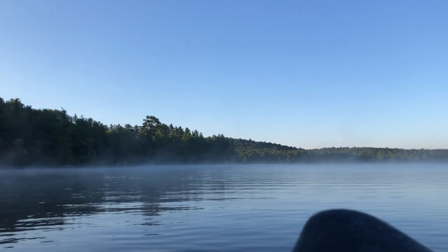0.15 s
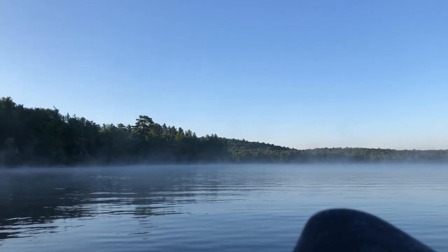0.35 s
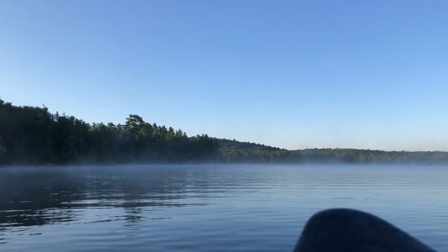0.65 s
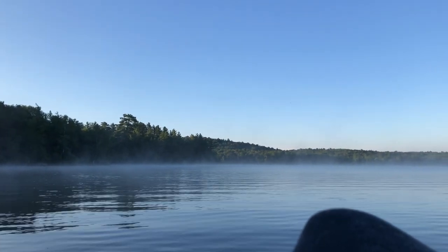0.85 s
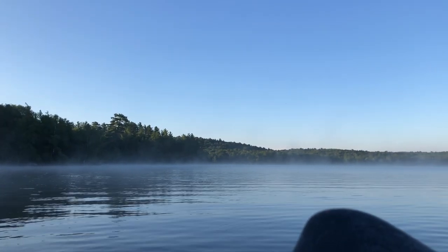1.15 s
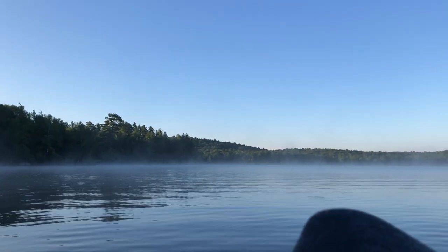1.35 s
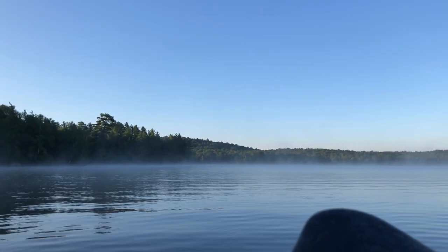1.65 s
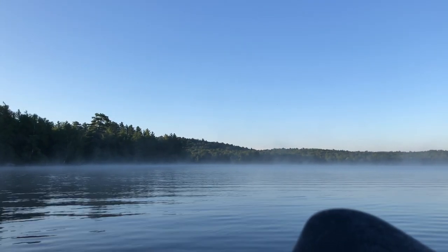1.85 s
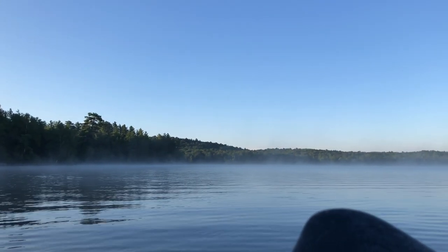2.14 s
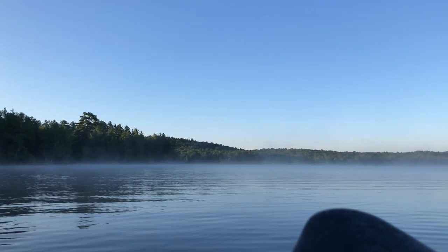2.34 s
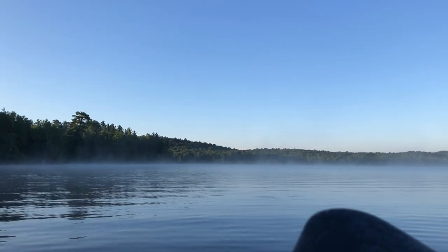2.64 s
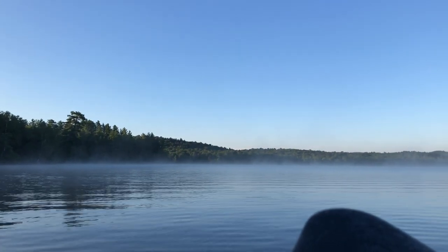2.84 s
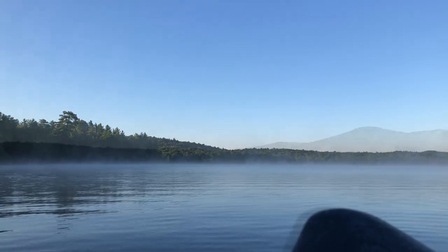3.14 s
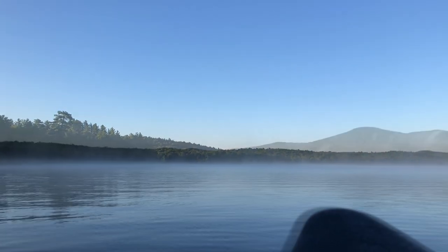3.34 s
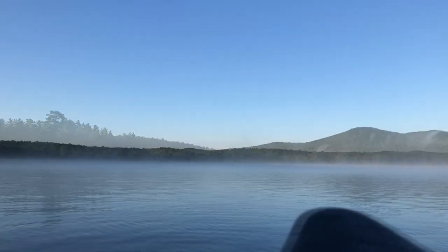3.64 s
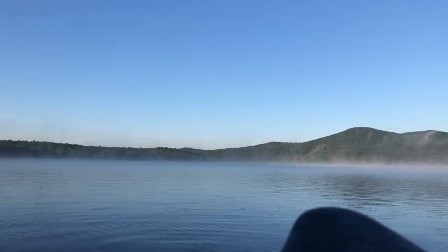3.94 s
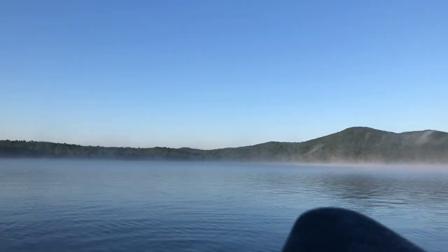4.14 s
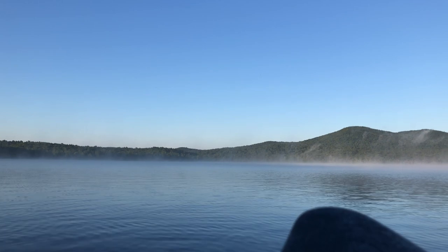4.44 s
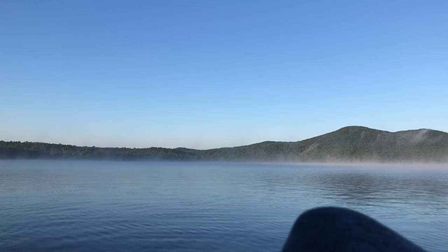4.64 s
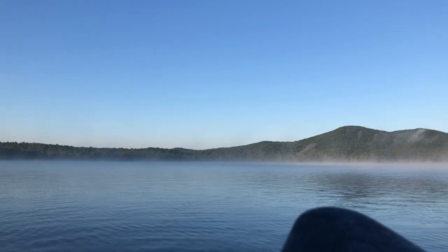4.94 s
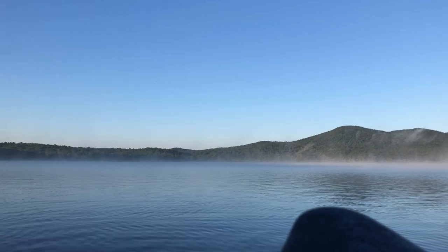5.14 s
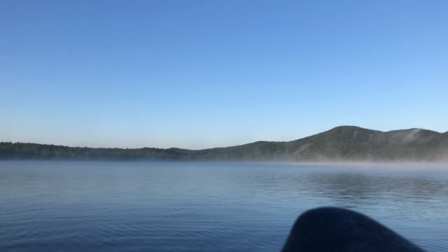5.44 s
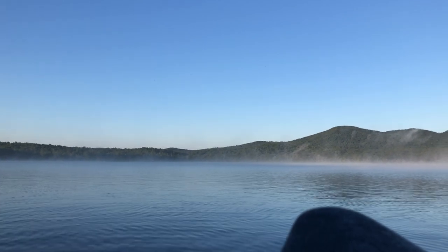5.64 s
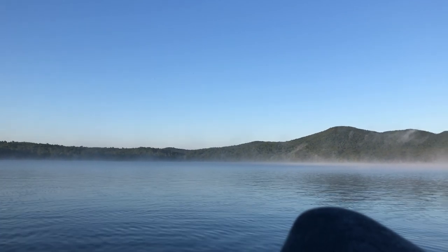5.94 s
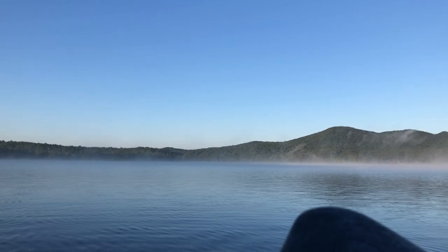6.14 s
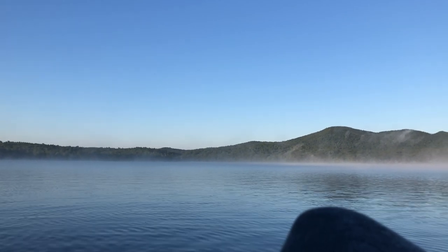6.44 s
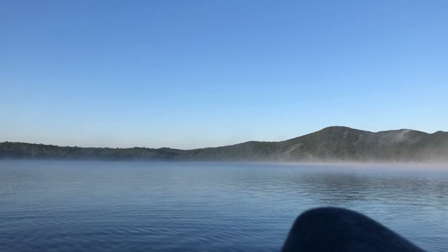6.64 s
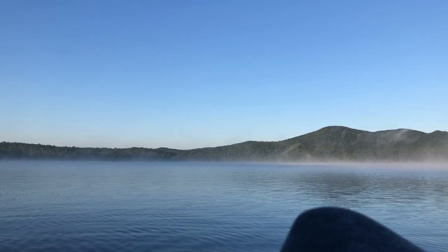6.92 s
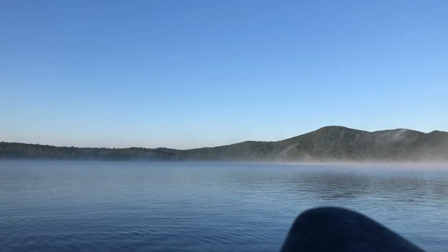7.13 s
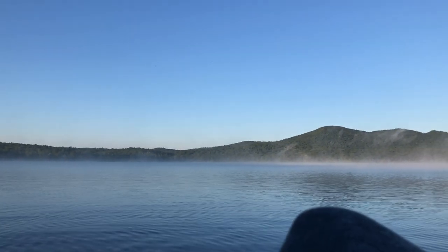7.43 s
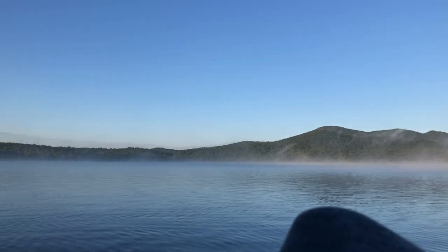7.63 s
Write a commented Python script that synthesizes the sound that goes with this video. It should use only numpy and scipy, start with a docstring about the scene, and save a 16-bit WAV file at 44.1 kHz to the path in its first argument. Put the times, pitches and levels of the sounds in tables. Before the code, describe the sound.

Heard from a small boat on a still lake, gentle lapping, gurgles and dull paddle bumps lie beneath three far-off loon tremolos and faint songbird notes. Then three close loon calls ring out overhead, each opening with a brief yelp and trailing a long echo. A faint low drone creeps in under the later calls, along with light microphone hiss.

```python
"""A calm lake, from a small boat. Loons fly over: their tremolos are nearly pure tones throbbing in pitch
and level, edged with short yelps, scattered by ripples and echoed by the wooded shores. Three distant
calls cross-fade into three close ones overhead. Water laps and gurgles, the hull rumbles and thumps,
and a songbird whistles on the shore. Late on, a faint low drone climbs in. The microphone hisses."""
import sys
import numpy as np
from scipy import signal
from scipy.fft import rfft, irfft, next_fast_len
from scipy.io import wavfile
from scipy.ndimage import map_coordinates

SR = 44100
rng = np.random.default_rng(int(sys.argv[2]) if len(sys.argv) > 2 else 0)


def transcribe(signal):
    """Save signal, clipped to [-1, 1], as a 16-bit WAV file at the path in sys.argv[1]."""
    frames = np.atleast_2d(signal).T
    limited = np.clip(frames, -1, 1)
    pcm = np.round(limited * 32767).astype(np.int16)
    wavfile.write(sys.argv[1], SR, pcm)


N = 343098

# loon tremolos: start t/s, end t/s, slump t/s, slump depth, t/s of one pitch dip, throb rate/Hz,
# crest f/Hz, swing/Hz, base level/dB, 2nd and 3rd harmonic level/dB re the fundamental,
# echo level/dB, Doppler ratio of the echo
LOON_CALLS = [(-.55, .25, .24, 0.61, .066, 12.3, 1252, 42.2, -50.7, -20.5, -26, -60.5, 1.006),
              (.628, 1.42, 1.4, 0.48, .683, 12.9, 1267, 57, -60, -19.5, -26, -61, 1.02),
              (1.828, 2.32, 2.17, .35, 2.102, 12, 1288, 46, -60.5, -15.5, -23, -61.5, 1.035),
              (4.569, 5.163, 5.152, 0.81, 4.73, 13.5, 1362, 76, -41.5, -40.5, -32, -58.3, 1),
              (5.558, 6.379, 6.346, 1, 5.579, 13.78, 1358, 70.7, -39, -33.5, -32, -56.5, 1.003),
              (6.702, 7.425, 7.342, 1.05, 6.752, 13.54, 1346, 62.3, -38, -29.5, -35, -58, 1.01)]
# throat resonance that colours the 4th harmonic: f/Hz, level/dB re the fundamental
THROAT_RESONANCE = [(4500, -44), (4850, -27), (5100, -37), (5300, -46.5), (5700, -52)]
# swells and fades in the loudness of the tremolos: t/s, gain/dB
TREMOLO_SWELLS = [(0, 2.5), (.11, -1.5), (.73, 1.5), (.97, -6.5), (1.17, 3), (1.96, -9), (2.06, 2.5),
                  (4.9, 0.5), (5.0, -2.5), (5.13, 1), (5.6, -.5), (6.1, 1), (6.72, -2), (6.94, 0.5),
                  (7.09, -1.5), (7.24, 1)]
# fader ride of the lapping: t/s, base level/dB
LAPPING_RIDE = [(0.0, -56), (1.08, -59), (1.86, -56), (3.03, -60.5), (3.4, -64), (7.78, -63.5)]
# colour of the lapping under the far calls: f/Hz, relative level/dB
FAR_LAPPING_EQ = [(20, -35), (60, -5.5), (110, -0.5), (170, 1), (250, -3.5), (320, -1), (470, -5),
                  (650, -3.5), (1000, -14), (1600, -23), (2100, -26.5), (3000, -28.5), (6000, -36),
                  (15000, -58)]
# colour of the lapping under the near calls: f/Hz, relative level/dB
NEAR_LAPPING_EQ = [(25, -34.5), (65, -0.5), (115, 0.9), (170, 1.6), (300, -1.5), (480, -6), (700, -9.5),
                   (1000, -13.5), (1500, -20.5), (2100, -22.5), (3000, -23), (6000, -34), (15000, -54.5)]
# fader ride of the hull's rumble: t/s, base level/dB
RUMBLE_RIDE = [(0.0, -72.5), (1.73, -67), (2.14, -73), (2.36, -65), (2.55, -63.5), (2.93, -69),
               (3.25, -66.5), (4.85, -76), (5.09, -71), (5.61, -77.5), (6.72, -78.5), (7.09, -70.5),
               (7.78, -80)]
# colour of the hull's rumble: f/Hz, relative level/dB
RUMBLE_EQ = [(18, -27), (35, -6), (50, 2.5), (80, 2), (120, -7.5), (200, -21), (500, -57)]
# colour of the microphone hiss: f/Hz, relative level/dB
HISS_EQ = [(100, -1), (2000, 2.5), (4800, 4), (7000, 1), (10000, -0.5), (13500, -1.5), (15000, 1.5),
           (16000, -4)]
# songbird notes before tuning and trim: start t/s, end t/s, first f/Hz, last f/Hz, level/dB
SONGBIRD_NOTES = [(.41, 0.447, 2640, 2780, -68), (0.85, 0.86, 3090, 2330, -60.5),
                  (1.495, 1.527, 4150, 4420, -75), (1.532, 1.569, 3250, 2500, -72),
                  (1.602, 1.66, 2830, 2500, -72), (1.67, 1.73, 2800, 2910, -78),
                  (1.75, 1.785, 3300, 2450, -72), (2.925, 2.956, 3200, 2910, -72),
                  (2.955, 2.978, 2900, 3160, -73), (3.067, 3.1, 3400, 2750, -70),
                  (3.111, 3.146, 2490, 3390, -68.5), (3.143, 3.188, 3250, 2240, -69),
                  (3.32, 3.348, 2750, 3250, -77), (3.359, 3.392, 3300, 2650, -76),
                  (4.335, 4.385, 4200, 4800, -76)]
# yelps that open or close a call: start t/s, end t/s, first f/Hz, last f/Hz, upward bow/Hz,
# base level/dB, fundamental level/dB re base
LOON_YELPS = [(0.59, 0.635, 690, 1030, -45, -55, -7), (1.789, 1.827, 779, 945, -11, -57, -7),
              (4.478, 4.518, 706, 807, -9, -53.5, -12), (4.508, 4.572, 833, 865, 71.5, -41.3, -17),
              (5.169, 5.19, 850, 690, -25.5, -57.5, -19), (5.525, 5.56, 767, 1017, -19.5, -40.5, -20),
              (6.679, 6.708, 730, 1030, -39, -42.3, -19)]
# overtones of a yelp: harmonic number, level/dB re base
YELP_OVERTONES = [(2, -1), (3, -36), (4, -32.5), (5, -32.5)]
# paddle and water bumping the hull: t/s, peak level/dB before trim and low cut, f/Hz
HULL_THUMPS = [(.912, -45.5, 70), (1.812, -43, 95), (1.83, -40.5, 67.7), (2.252, -40.5, 95),
               (2.418, -45, 55.5), (2.473, -42.5, 144.4), (2.487, -41.5, 61.9), (2.64, -51, 70),
               (2.91, -45.5, 75), (3.088, -48, 85.3), (3.157, -46, 65), (3.222, -45, 85),
               (3.275, -43, 89.6), (3.359, -45, 80), (3.745, -46, 56), (4.92, -49.5, 45)]

FADE_START_S, FADE_END_S = 3.13, 3.98  # cross-fade from the far calls to the near ones
CREST_LEAD_S, SAG_HZ_PER_S2 = .54, 290  # pitch crests this long before the slump, sagging either side
SLUMP_HZ, SLUMP_DB, SLUMP_S = 135, 4.5, .028  # the voice gives way: pitch drop, level drop, how quickly
LOUDEST_SHARE, ARCH_DB = 0.35, 19  # where a tremolo peaks; its fall one whole length from there
SLOWING_PER_S = .041  # share of the throb rate lost each second
BRIGHT_DB, BRIGHT_S = 8.5, 0.09  # overtone boost on the attack, and its decay


def amp(db):
    """Decibels to gain."""
    return 10 ** (np.asarray(db) / 20)


def unit(x):
    """Scale to rms 1."""
    return x / np.sqrt(np.mean(x ** 2) + 1e-20)


def eq_db(points, hz):
    """Level of an EQ curve at hz, on a log frequency axis."""
    freqs, levels = np.transpose(points)
    return np.interp(np.log(hz + 1), np.log(freqs), levels)


def ride_db(points, t):
    """Level of a fader ride at the times t."""
    return np.interp(t, *np.transpose(points))


def span(start, end, edge_s):
    """A note's sample times, its progress from 0 to 1, and a soft-edged gate."""
    t = np.arange(start, end, 1 / SR)
    gate = np.sin(np.pi / 2 * np.clip(np.minimum(t - t[0], t[-1] - t) / edge_s, 0, 1)) ** 2
    return t, (t - start) / (end - start), gate


def wobble(size, rate):
    """Smooth random modulation, rate knots a second."""
    return map_coordinates(rng.standard_normal(2 ** 13), [np.arange(size) * rate / SR], mode="wrap")


def phase_of(hz):
    """Running phase of a pitch curve."""
    return 2 * np.pi * np.cumsum(hz) / SR


def noise(eq):
    """Coloured noise of rms 1."""
    size = next_fast_len(N + 2 ** 13)
    colour = amp(eq_db(eq, np.fft.rfftfreq(size, 1 / SR)))
    return unit(irfft(rfft(rng.standard_normal(size)) * colour, size)[:N])


def add(track, start, x):
    """Mix x into the track at start seconds."""
    i = round(start * SR)
    x, i = x[max(-i, 0):], max(i, 0)
    track[i:i + len(x)] += x[:len(track) - i]


def tremolo(start, end, slump_s, depth, dip_s, throb_hz, crest_hz, swing_hz, level_db, second_db,
            third_db, sharpness=0.17, swell_db_per_hz=0.0643, jitter_hz=5, flutter_db=0.25,
            overtone_flutter_db=2.8, throb_scatter_db=2.3, dulling_db=4):
    """A loon's note throbs, louder as the pitch rises, until it slumps. Gives voice and envelope in dB."""
    t, progress, gate = span(start, end, edge_s=0.0053)
    slump = depth * (1 + np.tanh((t - slump_s) / SLUMP_S / 2)) / 2
    pitch = crest_hz - SAG_HZ_PER_S2 * (t - slump_s + CREST_LEAD_S) ** 2 - SLUMP_HZ * slump
    envelope_db = level_db - ARCH_DB * (progress - LOUDEST_SHARE) ** 2 - SLUMP_DB * slump
    throb = 2 * np.pi * throb_hz * (t - dip_s) * (1 - SLOWING_PER_S * (t - dip_s) / 2)
    # round crests, sharp dips
    bend_hz = -swing_hz * (1 - slump) * (np.cos(throb) + sharpness * np.cos(2 * throb))
    phase = phase_of(pitch + bend_hz + jitter_hz * wobble(len(t), 200))
    voice = amp(swell_db_per_hz * bend_hz + flutter_db * wobble(len(t), 120.6)) * np.sin(phase)
    bright_db = BRIGHT_DB * np.exp((start - t) / BRIGHT_S)
    overtones_db = [second_db + bright_db + 0.056 * bend_hz - dulling_db * slump,  # pumps with the throb
                    third_db + bright_db + .006 * bend_hz,  # hardly pumps
                    eq_db(THROAT_RESONANCE, 4 * pitch)]  # rings as it meets the resonance
    for k, db in enumerate(overtones_db, 2):
        flicker_db = overtone_flutter_db * wobble(len(t), 90.1)
        flicker_db += throb_scatter_db * wobble(len(t), 2 * throb_hz)
        voice += amp(db + flicker_db) * np.sin(k * phase)
    return np.sqrt(2) * gate * voice, envelope_db


def shore_echo(x, doppler=1, spread=.016, shores=3, t60=5.2, build_s=0.23,
               hill_s=1.25, hill_width_s=0.2, hill_db=-2, high_cut_hz=1800):
    """A long forest tail and a late hillside return; each shore gets its own Doppler shift of the bird."""
    t = np.arange(3 * SR) / SR
    hillside = 1 + amp(hill_db) * np.exp(-((t - hill_s) / hill_width_s) ** 2)
    decay = amp(-60 * t / t60) * (1 - np.exp(-t / build_s)) * hillside
    echo = np.zeros(len(x) + len(t))
    for ratio in doppler + spread * np.linspace(-1, 1, shores):
        shifted = np.interp(np.arange(0, len(x), ratio), np.arange(len(x)), x)
        add(echo, 0, signal.fftconvolve(shifted, rng.standard_normal(len(t)) * decay))
    echo /= np.linalg.norm(decay) * np.sqrt(shores)
    # the long path through the air dulls the overtones
    return signal.sosfilt(signal.butter(2, high_cut_hz, fs=SR, output="sos"), echo)


def air_shimmer(x, depth_db=2.5, rate=22):
    """A long path through uneven air makes a distant call swell and fade."""
    return x * amp(depth_db * wobble(N, rate))


def ripple_scatter(x, t60=0.23):
    """Rippled water throws back a short, blurred copy of a call."""
    t = np.arange(SR // 2) / SR
    tail = rng.standard_normal(len(t)) * amp(-60 * t / t60)
    return signal.fftconvolve(x, tail / np.linalg.norm(tail))[:N]


def loons(t, blend, far_scatter_db=-8, near_scatter_db=-28, yelp_echo_db=-18, echo_follow=0.3):
    """Tremolos and yelps with their echoes, first distant, then overhead."""
    far, near, far_echo, near_echo = np.zeros((4, N))

    def buses(start):
        return (far, far_echo) if start < FADE_START_S else (near, near_echo)

    for start, *call, echo_db, doppler in LOON_CALLS:
        voice, envelope_db = tremolo(start, *call)
        direct, echo = buses(start)
        add(direct, start, amp(envelope_db) * voice)
        # the shores lie all round, so they get a steadier level than the boat
        send = unit(amp(echo_follow * envelope_db) * voice)
        add(echo, start, amp(echo_db) * shore_echo(send, doppler))
    swell = amp(ride_db(TREMOLO_SWELLS, t))
    far *= swell
    near *= swell
    for start, *note, fundamental_db in LOON_YELPS:
        cry = yelp(start, note, fundamental_db)
        direct, echo = buses(start)
        add(direct, start, cry)
        add(echo, start, amp(yelp_echo_db) * shore_echo(cry))
    far_mix = air_shimmer(far) + far_echo + amp(far_scatter_db) * ripple_scatter(far)
    near_mix = near + near_echo + amp(near_scatter_db) * ripple_scatter(near)
    return np.sqrt(1 - blend) * far_mix + blend * near_mix


def gurgles(count=260, centre_hz=380, spread=0.501, cycles=12, rise=0.22, size_db=4.0):
    """Small bubbles beside the hull, each ringing briefly with a rising pitch."""
    bubbles, t = np.zeros(N), np.arange(SR // 10) / SR
    starts = rng.uniform(0, N / SR, count)
    pitches = centre_hz * np.exp(spread * rng.standard_normal(count))
    sizes = np.minimum(rng.exponential(1, count), 3)
    for start, hz, size in zip(starts, pitches, sizes):
        age = t * hz / cycles
        envelope = amp(size_db * size - 26 * age) * (1 - np.exp(-t * hz))
        add(bubbles, start, envelope * np.sin(phase_of(hz * (1 + rise * age))))
    return unit(bubbles)


def lapping(t, blend, far_db=1.78, near_db=3.0, gurgle_db=-7):
    """Water laps at the boat: a dark wash dotted with bubbles."""
    far = np.sqrt(1 - blend) * amp(far_db) * noise(FAR_LAPPING_EQ)
    near = np.sqrt(blend) * amp(near_db) * noise(NEAR_LAPPING_EQ)
    return amp(ride_db(LAPPING_RIDE, t)) * (far + near + amp(gurgle_db) * gurgles())


def hull_rumble(t, trim_db=2, heave_db=3.0):
    """The hull rumbles unevenly as it rocks."""
    return amp(ride_db(RUMBLE_RIDE, t) + trim_db + heave_db * wobble(N, 9)) * noise(RUMBLE_EQ)


def microphone_hiss(blend, level_db=-71.5):
    """Two beds of hiss; the level dips in the middle of their cross-fade."""
    return amp(level_db) * ((1 - blend) * noise(HISS_EQ) + blend * noise(HISS_EQ))


def glide(start, end, from_hz, to_hz, bow_hz, level_db, partials,
          crack=0, crack_s=0.005, jitter=0.0035, loudest_share=0.48, arch_db=29):
    """A short bird note that slides, swells and fades; crack roughens the pitch at its end."""
    t, progress, gate = span(start, end, edge_s=0.0046)
    hz = from_hz + (to_hz - from_hz) * progress + bow_hz * np.sin(np.pi * progress)
    envelope = gate * amp(level_db - arch_db * (progress - loudest_share) ** 2)
    roughness = jitter + crack * np.exp((t - end) / crack_s)
    phase = phase_of(hz * (1 + roughness * wobble(len(t), 1200)))
    return np.sqrt(2) * envelope * sum(amp(db) * np.sin(k * phase) for k, db in partials)


def songbird(tuning=0.99, trim_db=-2.5, scatter_db=-3):
    """Faint slurred whistles from the trees, each a pure straight glide."""
    song = np.zeros(N)
    for start, end, from_hz, to_hz, db in SONGBIRD_NOTES:
        add(song, start, glide(start, end, from_hz, to_hz, 0, db, [(tuning, trim_db)]))
    return song + amp(scatter_db) * ripple_scatter(song)


def yelp(start, note, fundamental_db):
    """A loon's quick glide, led by its 2nd harmonic; the voice cracks at the end."""
    return glide(start, *note, [(1, fundamental_db), *YELP_OVERTONES], crack=.14)


def thumps(sag_per_s=3, width_cycles=0.86, trim_db=-1, low_cut_hz=30):
    """Paddle and water bump the hull: soft low pushes of a cycle or two, sagging in pitch."""
    hull, t = np.zeros(N), np.arange(-SR // 10, SR // 10) / SR
    for peak_s, db, hz in HULL_THUMPS:
        phase = phase_of(hz * np.exp(-sag_per_s * t)) + rng.uniform(0, 2 * np.pi)
        envelope = amp(db + trim_db) / np.cosh(2 * t * hz / width_cycles)
        add(hull, peak_s + t[0], envelope * np.sin(phase))
    # the microphone passes little of the deepest bass
    return signal.sosfilt(signal.butter(2, low_cut_hz, "highpass", fs=SR, output="sos"), hull)


def drone(t, start_s=4.98, fade_in_s=0.22, climb_s=1.3, from_hz=66, to_hz=85.3,
          settled_db=-64.5, db_per_hz=.25, waver_db=1, waver_hz=0.5, octave_db=-10):
    """A far low drone climbs in pitch, growing louder, and settles."""
    age = t - start_s
    climb = np.sin(np.pi / 2 * np.clip(age / climb_s, 0, 1)) ** 2
    hz = from_hz + (to_hz - from_hz) * climb
    db = settled_db + db_per_hz * (hz - to_hz) + waver_db * wobble(N, 4.05)
    envelope = np.clip(age / fade_in_s, 0, 1) * amp(db)
    phase = phase_of(hz + waver_hz * wobble(N, 5))
    return np.sqrt(2) * envelope * (np.sin(phase) + amp(octave_db) * np.sin(2 * phase))


def scene():
    """Mono mix of two spots on the lake, one fading into the other."""
    t = np.arange(N) / SR
    blend = np.clip((t - FADE_START_S) / (FADE_END_S - FADE_START_S), 0, 1)
    hiss = microphone_hiss(blend)
    birds = loons(t, blend) + songbird()
    boat = thumps() + lapping(t, blend) + hull_rumble(t)
    return (birds + boat + drone(t) + hiss)[None]


def record(dry, high_cut_hz=15850):
    """A brick-wall high cut on the whole mix."""
    size = next_fast_len(N + SR // 2)
    passband = np.fft.rfftfreq(size, 1 / SR) < high_cut_hz
    return irfft(rfft(dry, size) * passband, size)[..., :N]


dry = scene()
out = record(dry)
transcribe(out)
```